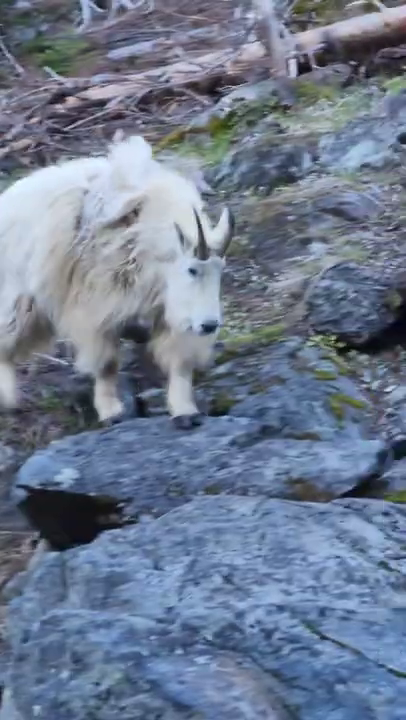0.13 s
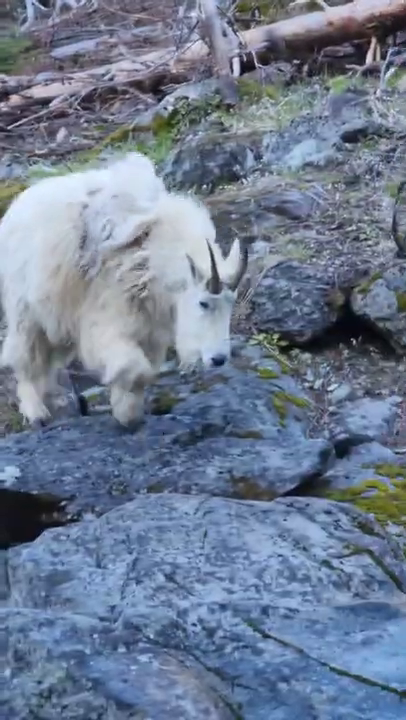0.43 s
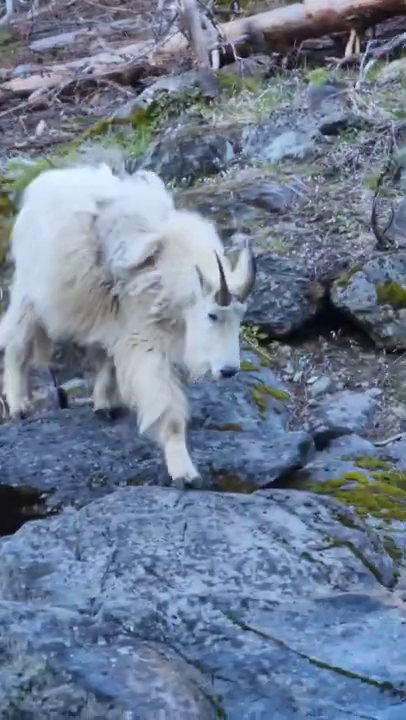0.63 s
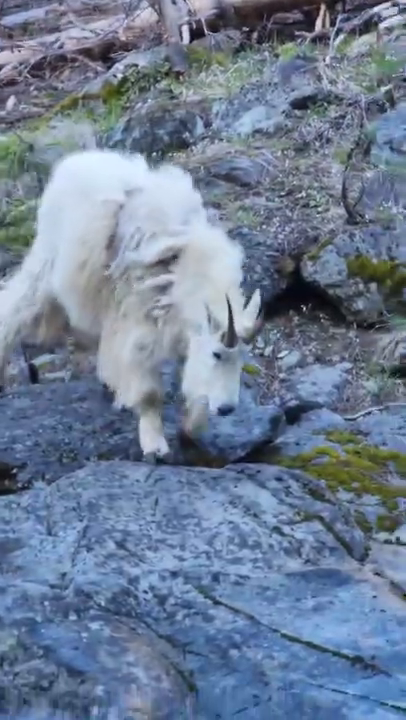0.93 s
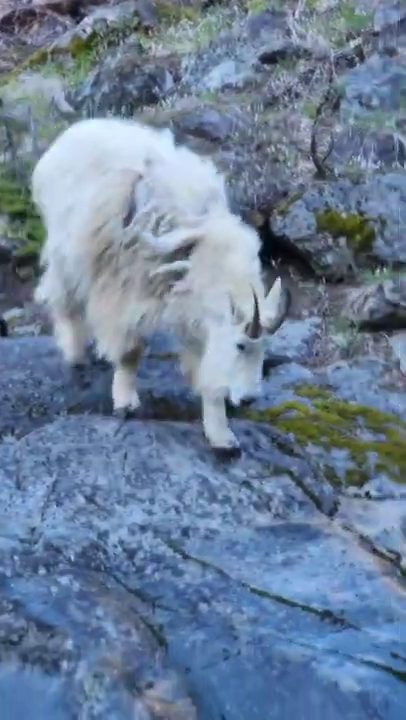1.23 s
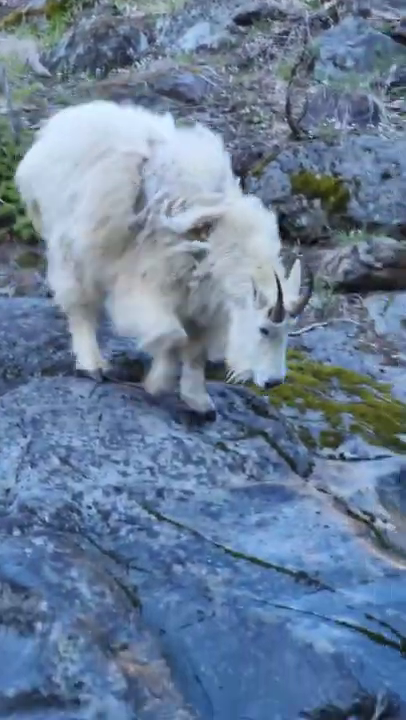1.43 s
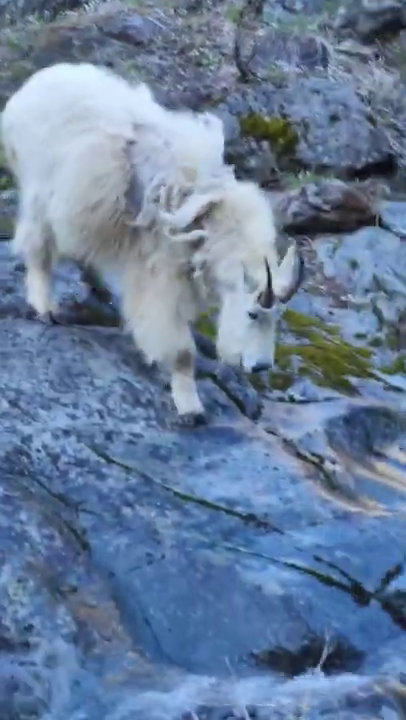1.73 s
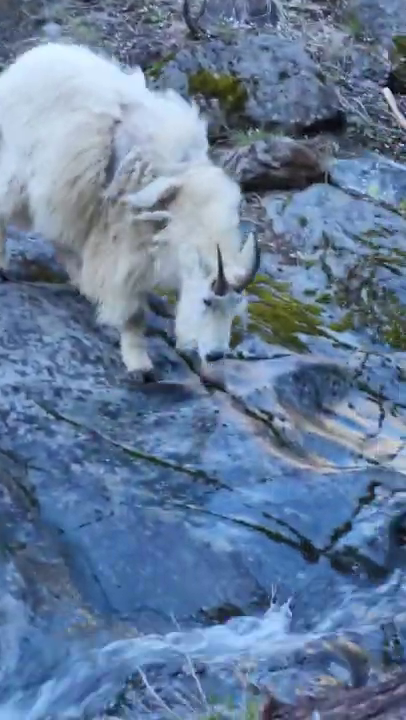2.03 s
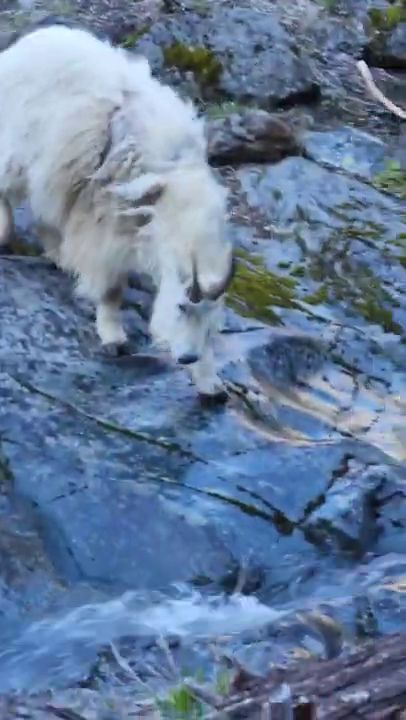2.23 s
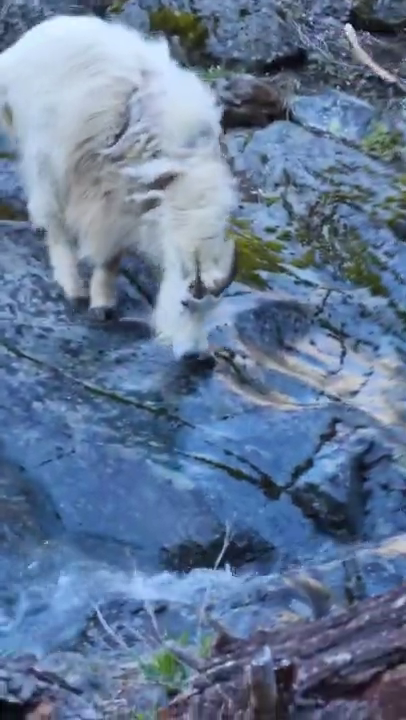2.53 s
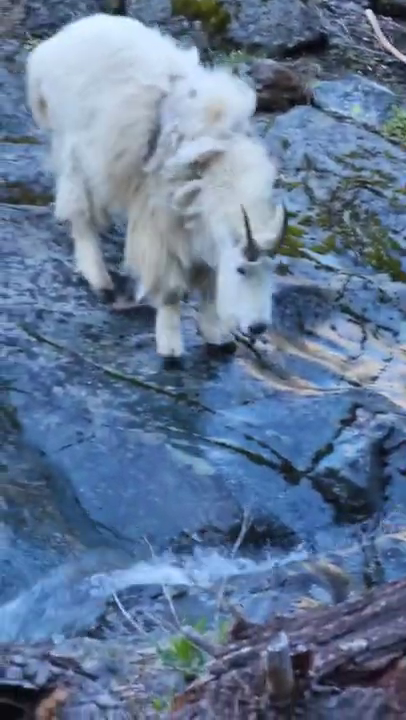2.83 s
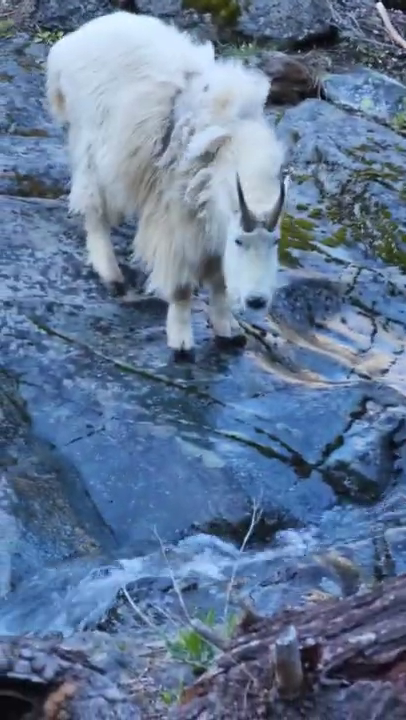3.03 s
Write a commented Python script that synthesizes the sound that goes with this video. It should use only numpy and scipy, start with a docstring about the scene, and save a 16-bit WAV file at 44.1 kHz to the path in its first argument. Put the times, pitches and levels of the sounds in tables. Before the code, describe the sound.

Rushing creek water pours over stones outdoors, lumpy bass underneath, fine burbling and wash above.

```python
"""Mountain stream over rock

A stream rushes over rock near a hand-held stereo camera; after a short silence the sound starts abruptly.
The lumpy low rumble and the hissing wash of spray are shaped noise; the dense crowd of small bubbles
is made of short rising tones. Each of the three swells and sinks along its own level curve.
A noise suppressor then works on the whole mix."""
import sys
import numpy as np
from scipy import signal
from scipy.io import wavfile
from scipy.ndimage import uniform_filter1d

SR = 44100
rng = np.random.default_rng(int(sys.argv[2]) if len(sys.argv) > 2 else 0)


def transcribe(signal):
    """Save signal, clipped to [-1, 1], as a 16-bit WAV file at the path in sys.argv[1]."""
    frames = np.atleast_2d(signal).T
    limited = np.clip(frames, -1, 1)
    pcm = np.round(limited * 32767).astype(np.int16)
    wavfile.write(sys.argv[1], SR, pcm)


def volts(x):
    """Linear amplitude factor 10**(x/20) for a level x in dB, scalar or array-like."""
    e = np.asarray(x, float) / 20
    return 10 ** e


N = 140679

# How much louder the left side is at each pitch. Each row: frequency in Hz, left minus right in dB.
LEFT_LEAN = [(40, -2.5), (110, -0.8), (380, -3.), (690, 0.9), (1280, -3.5), (3300, 4.5), (4500, -.8),
             (7000, 3.3), (8800, 7), (9800, 4), (11500, -7), (12600, 5), (14200, 11)]
# How far the left side runs ahead at each pitch. Each row: frequency in Hz, lead in radians.
LEFT_LEAD = [(43, -.23), (215, -.02), (600, .4), (970, .8), (1190, -.15), (1720, .35), (2150, .13),
             (2600, .45), (3300, -1.9), (5700, -1.7), (8200, -3.3), (9600, -3.6), (11300, -4.8),
             (13300, -4.6)]


def evened(x):
    """Scales a sound to an average strength (rms) of 1."""
    return x / np.sqrt(np.mean(x ** 2) + 1e-20)


def read(points, hz):
    """Reads a table at the given frequencies, in straight lines along a logarithmic pitch scale."""
    f, value = np.transpose(points)
    return np.interp(np.log(hz + 1), np.log(f + 1), value)


def level(curve):
    """Turns a table of seconds and dB into a gain for every sample."""
    s, db = np.transpose(curve)
    return volts(np.interp(np.arange(N) / SR, s, db))


def noise(tone, patchy_db, flicker_db, size):
    """Stereo noise from random short-time spectra, with drifting patches and a wide-band flicker."""
    # How alike the two sides are. Each row: frequency in Hz, likeness (1 = the same noise).
    likeness = [(43, .98), (107, .997), (215, .97), (430, .85), (775, .83), (1100, .58), (1720, .7),
                (2150, .67), (2600, .42), (4600, .36), (6400, .08), (8200, .3), (9600, .25), (10500, .03),
                (12000, .28), (14000, .08)]
    hop = size // 4
    frames, hz = N // hop + 5, np.fft.rfftfreq(size, 1 / SR)
    a, b, c, d, patches = rng.standard_normal((frames, len(hz), 5)).T

    # patches spread over 12 neighbouring frequencies and 10 frames
    patches = uniform_filter1d(patches, size=12, axis=0)
    patches = evened(uniform_filter1d(patches, size=10, axis=1))
    # the flicker moves all frequencies at once
    flicker = evened(uniform_filter1d(rng.standard_normal(frames), size=4))
    loudness_db = read(tone, hz)[:, None] + patchy_db * patches + flicker_db * flicker

    # the right side mixes a phase-shifted copy of the left with noise of its own
    same = np.clip(read(likeness, hz), -1, 1)[:, None]
    left = a + 1j * b
    shifted = np.exp(-1j * read(LEFT_LEAD, hz))[:, None] * left
    right = same * shifted + np.sqrt(1 - same ** 2) * (c + 1j * d)

    lean = volts(.5 * read(LEFT_LEAN, hz))[:, None]
    spectra = np.array([left * lean, right / lean]) * volts(loudness_db)
    sound = signal.istft(spectra, nperseg=size, noverlap=size - hop)[1]
    return evened(sound[:, :N])


def rumble():
    """Water pounding the rock: lumpy, nearly mono bass."""
    # Rise and fall of the rumble. Each row: time in seconds, level in dB.
    swell = [(0.13, -18), (0.17, -15), (0.22, -22), (0.59, -24.5), (0.62, -27), (0.73, -20), (0.89, -18),
             (0.93, -28), (0.96, -18), (1.0, -23), (1.1, -19), (1.14, -29), (1.18, -21), (1.5, -22),
             (1.64, -28.5), (1.71, -22.5), (1.79, -23.5), (1.85, -17), (1.87, -21), (2.12, -25),
             (2.59, -18.5), (2.63, -24.5), (2.75, -23), (2.83, -25), (3.04, -17.5), (3.19, -21)]
    # Tone colour of the rumble. Each row: frequency in Hz, relative strength in dB per Hz.
    tone = [(12, -45), (20, -34), (64, -1), (107, 0.5), (126, -1.5), (258, -15.5), (400, -24), (520, -53),
            (880, -120)]
    return level(swell) * noise(tone, patchy_db=0.27, flicker_db=0.67, size=2048)


def wash():
    """Spray and countless far bubbles merged into a hiss."""
    # Rise and fall of the spray. Each row: time in seconds, level in dB before the lift below.
    rush = [(.13, -36.5), (.25, -35), (.38, -37), (.59, -36), (.66, -37.5), (.87, -35.5), (1.02, -37),
            (1.09, -35.5), (1.13, -38), (1.27, -35), (1.35, -38), (1.39, -41), (1.65, -40), (1.7, -38),
            (1.87, -37.5), (2.06, -37), (2.1, -41.5), (2.2, -41.5), (2.23, -38), (2.27, -41), (2.31, -37),
            (2.37, -36), (2.39, -41), (2.41, -38), (2.44, -40.5), (2.47, -36), (2.53, -36), (2.6, -36),
            (2.63, -40.5), (2.66, -39), (2.74, -42), (2.95, -42), (2.99, -36), (3.05, -35), (3.19, -38)]
    # Tone colour of the hiss. Each row: frequency in Hz, relative strength in dB per Hz.
    tone = [(150, -30), (250, -0.5), (335, -10.5), (434, -8.5), (542, -14), (925, -13), (1030, -14.5),
            (1450, -9), (2080, -11.5), (2550, -18), (3190, -17.5), (4140, -19), (5350, -17), (6040, -22),
            (7550, -18.5), (9780, -26), (11800, -20), (13600, -23), (15300, -36)]
    lift_db = 7
    return level(rush) * volts(lift_db) * noise(tone, patchy_db=0.79, flicker_db=0.22, size=1024)


def bubbles(count=48):
    """Short rising tones, each size (pitch) from its own place across the stream."""
    # Rise and fall of the bubbling. Each row: time in seconds, level in dB before the trim below.
    bubbling = [(0.13, -35.5), (0.15, -29.5), (0.42, -33.5), (1.25, -34.5), (1.27, -26.5), (1.34, -34),
                (1.62, -39.5), (2.01, -35), (2.1, -37.5), (2.56, -36.5), (2.75, -38), (3.02, -35),
                (3.04, -28.5), (3.19, -36)]
    # Strength of one bubble by its pitch. Each row: frequency in Hz, relative strength in dB.
    bubble_tone = [(350, -5.5), (440, -3.), (560, -10.5), (680, -10), (900, -5), (1050, -8), (1450, 0.4),
                   (2050, -1.3), (2500, -9), (3200, -13)]
    trim_db, spread_db = -3.5, 3.5
    per_second, lowest_hz, highest_hz = 800, 349.8, 3182
    cycles, glide = 20.2, .02  # the pitch has risen by 2 * glide (4 %) after about this many cycles

    # random start times, each with a random strength
    starts = rng.random(N) < per_second / SR
    strength = volts(spread_db * np.minimum(rng.exponential(1, N), 5)) * starts
    kind = rng.integers(0, count, N)
    place = rng.uniform(-0.82, 1, count)  # positive is to the left

    out = np.zeros((2, N))
    for k, hz in enumerate(np.geomspace(lowest_hz, highest_hz, count)):
        turns = np.arange(0, 3 * cycles / hz, 1 / SR) * hz
        u = turns / cycles
        side_db = .5 * read(LEFT_LEAN, hz) + 1.5 * place[k]
        lead = read(LEFT_LEAD, hz) + 0.97 * place[k]
        phase = 2 * np.pi * turns * (1 + glide * u) - np.array([[0], [lead]])
        envelope = u * np.exp(-2.5 * u)  # swells quickly, then dies away
        ring = volts([[side_db], [-side_db]]) * envelope * np.sin(phase)
        hits = (strength * (kind == k))[None]
        out += volts(read(bubble_tone, hz)) * signal.oaconvolve(hits, ring, axes=1)[:, :N]
    return level(bubbling) * volts(trim_db) * evened(out)


def scene():
    """Adds the rumble, the wash and the bubbles."""
    return rumble() + wash() + bubbles()


def suppressor(x):
    """Takes a share of the running mean power off each frequency, so weak moments sink below strong ones."""
    # Strength of the suppression. Each row: frequency in Hz, share of the running mean taken away.
    taken = [(150, 0.13), (500, 0.32), (2000, 0.33), (8000, 0.12), (15000, 0.17)]
    floor_db = -4  # least gain, before the make-up gain
    hz, _, z = signal.stft(x, SR, nperseg=1024, noverlap=768)
    power = uniform_filter1d((abs(z) ** 2).mean(0), size=3, axis=1) + 1e-20
    # running mean over 40 frames and 3 neighbouring frequencies
    around = uniform_filter1d(power, size=40, axis=1)
    around = uniform_filter1d(around, size=3, axis=0)
    share = np.clip(read(taken, hz), 0, .9)[:, None]
    power_left = np.maximum(1 - share * around / power, volts(2 * floor_db))
    gain = np.sqrt(power_left / (1 - share))  # the division makes up for the power lost
    return signal.istft(z * gain, SR, nperseg=1024, noverlap=768)[1][:, :N]


def roll_off(x):
    """The treble ends steeply here."""
    return signal.sosfilt(signal.butter(12, 15450, fs=SR, output="sos"), x)


def record(dry):
    """Suppresses noise and keeps silence until the sound cuts in."""
    start_s = .1158
    started = np.arange(N) >= start_s * SR
    mix = suppressor(dry) * started
    return roll_off(mix)


dry = scene()
out = record(dry)
transcribe(out)
```